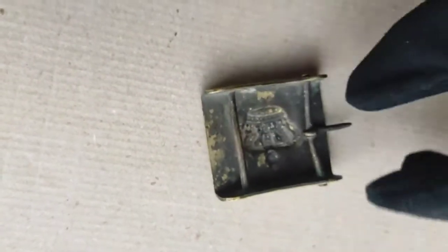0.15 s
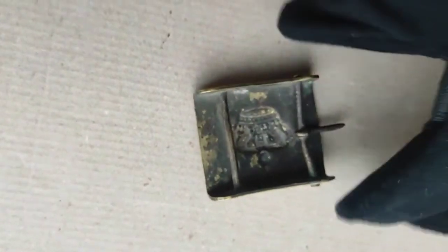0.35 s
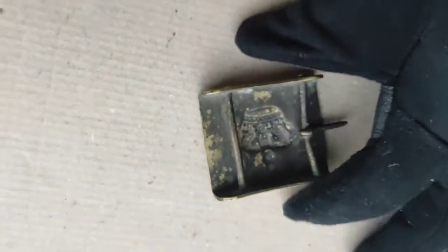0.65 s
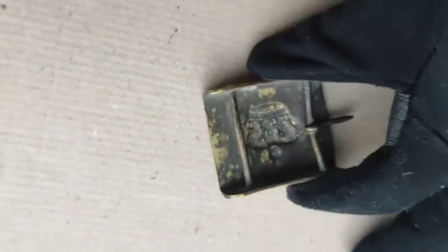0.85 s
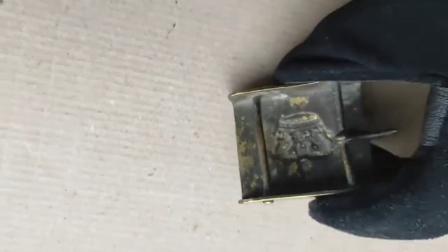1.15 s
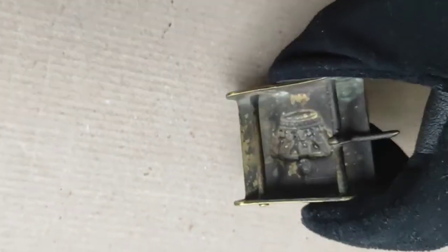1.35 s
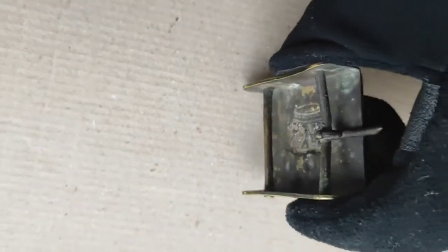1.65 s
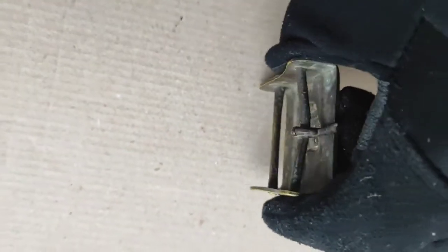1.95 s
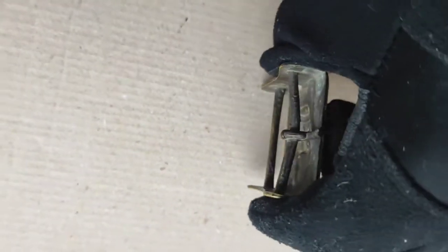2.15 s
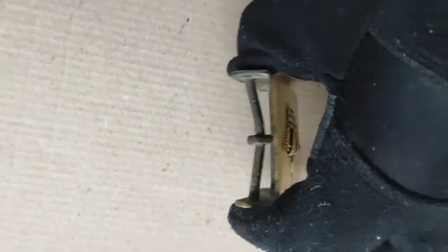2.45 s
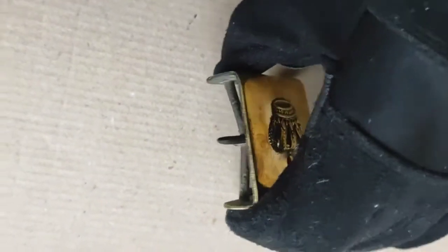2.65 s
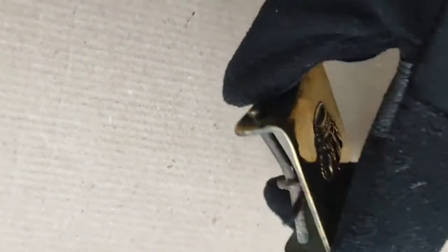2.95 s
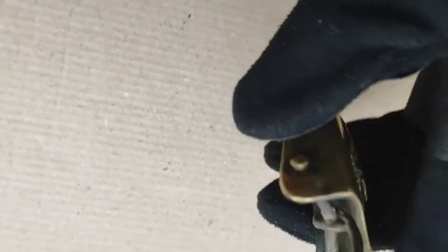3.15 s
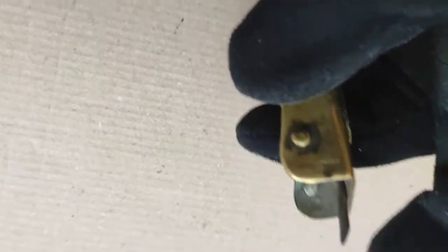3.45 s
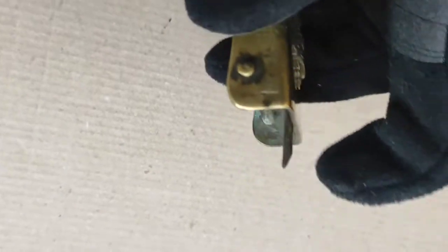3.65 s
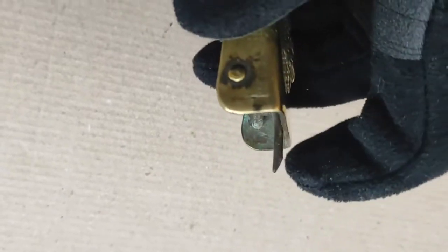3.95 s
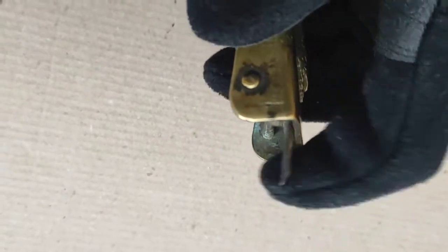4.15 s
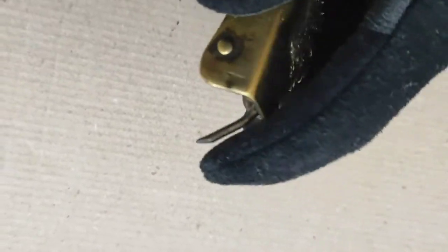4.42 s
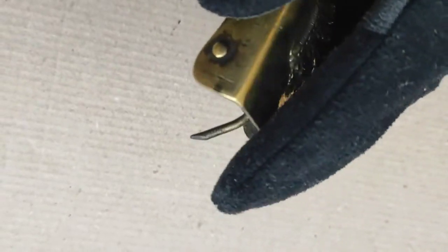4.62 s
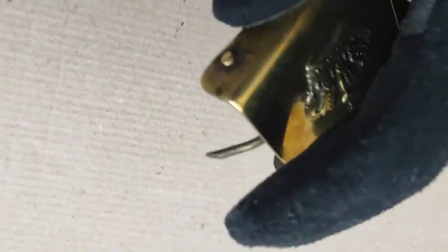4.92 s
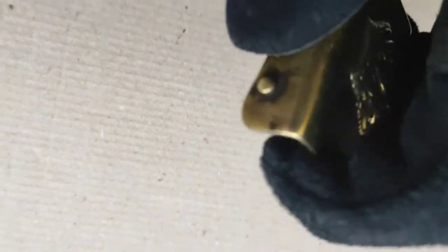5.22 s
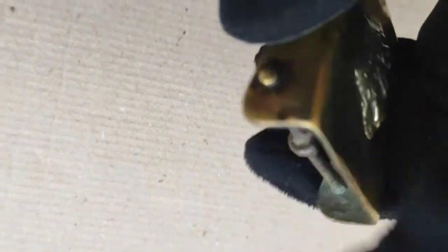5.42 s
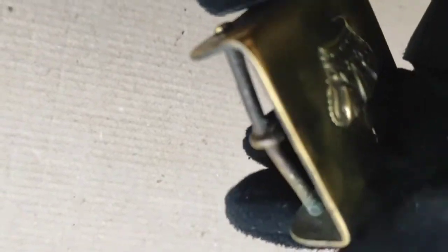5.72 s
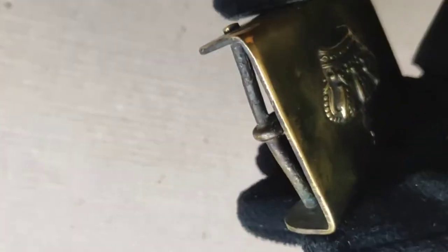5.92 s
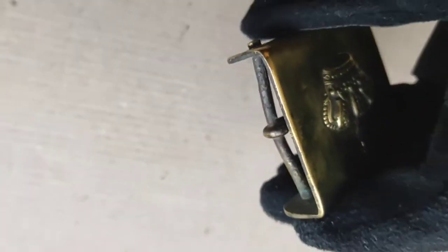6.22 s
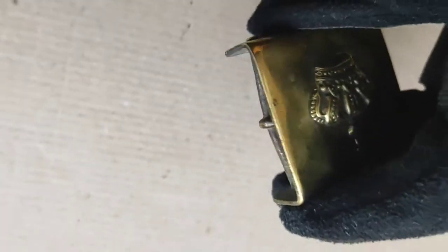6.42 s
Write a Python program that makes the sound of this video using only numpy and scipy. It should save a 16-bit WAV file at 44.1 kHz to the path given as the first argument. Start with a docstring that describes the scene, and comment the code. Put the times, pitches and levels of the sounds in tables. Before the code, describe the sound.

Gloved fingers rub a wooden table in soft strokes, a small brass buckle knocks on wood, then ticks and clinks sharply while turned close by.

```python
"""From the start, gloved fingers stroke a table top over room noise, a fan hum and faint pips: shaped friction noise.
Soft pushes thump, then near one second a small brass buckle knocks on the wood: decaying modes and contact noise.
The fingers lift the buckle and turn it close by; its loose tongue ticks, by scrapes and light ringing of the brass.
Later the tongue squeaks faintly as it swings, a gliding tone, and three times clinks on the frame: struck modes.
The glove strokes go on to the end; a short diffuse room tail follows the metal and table sounds."""
import sys
import numpy as np
from scipy import signal
from scipy.fft import rfft, irfft
from scipy.io import wavfile

SR = 44100
rng = np.random.default_rng(int(sys.argv[2]) if len(sys.argv) > 2 else 0)


def generate_wav(signal):
    """Clip the signal to [-1, 1] and save it as 16-bit WAV at the path in sys.argv[1]."""
    frames = np.transpose(np.atleast_2d(signal))
    scaled = np.clip(frames, -1, 1) * 32767
    pcm = np.round(scaled).astype(np.int16)
    wavfile.write(sys.argv[1], SR, pcm)


N = 290178  # samples
T = np.arange(N) / SR  # s
LEAD_S = 0.002  # silence before each blow
LIFT_S, LIFT_TAKES_S = 1.21, 0.19  # the hand leaves the table with the buckle
EDGE_HZ = 15900  # upper band limit

# In a spectrum or a set of modes the levels are relative: the sound is scaled as a whole afterwards.
# Likeness of the two microphones: pitch_hz, correlation (-1 to 1)
STEREO_LIKENESS = [(30, 0.39), (60, 1), (150, 0.79), (210, 1), (310, -0.94), (640, 0.48), (1400, -0.3),
                   (3000, 0.024)]
# Stereo balance of noise: pitch_hz, left_over_right_db
STEREO_BALANCE = [(60, 6), (200, 2), (380, 10), (700, 4), (1300, 5), (2400, 2), (4400, -2), (9000, 0.5)]
# Low room noise, before a treble cut: pitch_hz, level_db_per_hz
AIR_SPECTRUM = [(12, -28), (29, 6), (39, -8.5), (52, -5), (81, -17), (195, -0.5), (248, -9), (286, -2),
                (320, -6.5), (399, -10), (426, -11), (454, -11.5), (654, -22), (900, -25.5), (1170, -41),
                (1980, -120)]
# Thin background hiss: pitch_hz, level_db_per_hz
FAINT_HISS_SPECTRUM = [(400, -21), (800, 0), (1500, -3.5), (3000, -9), (5000, -12), (7800, -5),
                       (10000, -21.5), (15500, -30)]
# Lines of the fan, before the left-right balance: pitch_hz, level_db
FAN_LINES = [(199.6, -67), (300, -76), (399.5, -71.5), (598, -84.5), (700, -81), (912, -91.5), (1006, -92)]
# A gloved finger slides and comes to rest; rub_db is the reference for cloth, table drone and thread catches:
# start_s, rise_s, hold_s, fade_db_per_s, hiss_db, rub_db
STROKES = [(0.0, 0.0014, 0.054, 75, -53.5, -58.5), (0.172, 0.053, 0.066, 85, -66, -72),
           (0.282, 0.05, 0.0044, 82, -44, -50.5), (0.516, 0.089, 0.032, 87, -45, -53.5),
           (0.597, 0.06, 0.02, 78, -43, -51.5), (0.722, 0.036, 0.024, 99, -44.5, -51),
           (0.869, 0.073, 0.025, 81, -48, -52.5), (0.976, 0.047, 0.12, 166, -46.5, -55),
           (1.232, 0.037, 0.046, 69, -51, -56), (1.385, 0.026, 0.1, 87, -66, -65.5),
           (1.558, 0.032, 0.056, 86, -63.5, -85), (1.691, 0.11, 0.029, 110, -56.5, -57.5),
           (1.878, 0.026, 0.058, 118, -64.5, -62), (1.982, 0.023, 0.16, 85, -66, -81),
           (2.148, 0.093, 0.21, 81, -58.5, -68), (2.515, 0.039, 0.086, 95, -59, -72),
           (2.695, 0.036, 0.012, 124, -59, -60.5), (2.771, 0.032, 0.32, 67, -57, -69.5),
           (3.16, 0.059, 0.18, 118, -60, -70), (3.476, 0.031, 0.41, 83, -70, -71.5),
           (4.11, 0.051, 0.011, 71, -61.5, -87), (4.282, 0.033, .02, 130, -68, -78),
           (4.426, 0.039, .005, 130, -56, -73), (4.552, 0.013, 0.15, 79, -62.5, -77),
           (4.717, 0.034, 0.12, 83, -63, -77.5), (4.886, 0.12, 0.023, 78, -58, -71),
           (5.086, 0.1, 0.22, 81, -57, -68), (5.405, 0.045, 0.24, 77, -56, -70),
           (5.768, 0.026, 0.13, 112, -63.5, -79), (5.976, 0.035, .05, 85, -63.5, -87),
           (6.067, 0.045, 0.09, 85, -59.5, -75), (6.224, 0.034, 0.023, 85, -57.5, -71),
           (6.372, 0.098, 0.067, 85, -60.5, -71)]
# Fibre hiss: pitch_hz, level_db_per_hz
FIBRE_SPECTRUM = [(1500, -23), (3000, -16), (3600, -11), (4300, -11.5), (5100, -11.5), (5600, -6),
                  (6150, -7), (7000, 0.5), (7900, 2), (9200, -5), (10000, -21.5), (11500, -21.5),
                  (14500, -23), (16000, -30)]
# Rub of the cloth: pitch_hz, level_db_per_hz
CLOTH_SPECTRUM = [(250, -33), (600, 3.5), (900, -8), (1300, 1), (1900, 5), (2700, 4), (4000, -13),
                  (7000, -25)]
# Drone of the table, also the colour of a knock's thud: pitch_hz, level_db_per_hz
DRONE_SPECTRUM = [(70, -52), (170, 4.5), (300, -3), (480, -16.5), (700, -2), (1000, -8), (1600, -15),
                  (3000, -34)]
# A thread letting go: pitch_hz, level_db_per_hz
SNAG_SPECTRUM = [(300, 0.5), (900, 1.5), (2300, -6.5), (4000, -8), (7500, 1.5), (10000, -69)]
# A fingertip lands or slips: start_s, level_db, length_s, centre_hz, width_octaves
SCUFFS = [(0.047, -50.5, 0.092, 1870, 0.46), (0.031, -52, 0.15, 185, 0.73),
          (0.2867, -44.5, 0.057, 448, 1.32), (0.298, -47.5, 0.071, 614, 0.24),
          (0.587, -45.5, 0.025, 524, 1.04), (0.613, -43, 0.019, 980, 0.89), (0.757, -47, 0.095, 850, 0.72),
          (1.245, -46, 0.024, 453, 0.37), (1.273, -47, 0.053, 430, 0.39), (1.483, -62.5, 0.07, 1890, 0.26),
          (1.719, -53.5, 0.076, 400, 0.59), (1.793, -51, 0.018, 950, 0.96),
          (1.801, -49.5, 0.037, 825, 0.87), (1.824, -61, 0.0077, 1100, .7), (1.938, -47, 0.0067, 920, 0.75),
          (1.955, -61.5, 0.045, 1194, 0.69), (2.118, -56, 0.01, 940, 0.51),
          (2.222, -49.5, 0.039, 430, 0.31), (2.567, -58.5, 0.055, 890, 0.43),
          (2.578, -57, 0.011, 900, 0.49), (2.688, -60.5, 0.051, 1300, 0.62), (2.727, -53, 0.046, 910, 0.76),
          (2.756, -51, 0.012, 746, 0.35), (3.173, -56, 0.074, 420, 0.38)]
# A fingertip lands and judders on the table: start_s, pitch_hz, level_db, t60_s
THUMPS = [(0.291, 445, -36.5, 0.084), (0.317, 547, -40, 0.058), (0.333, 550, -42, 0.055),
          (0.362, 518, -42.5, .06)]
# The buckle knocks on the table: start_s, level_db, brightness_db
KNOCKS = [(0.9755, -32.5, -3), (.987, -43, -3), (.998, -61, -2), (1.1099, -42.5, -5), (1.1587, -32.5, 7),
          (1.169, -43, -6), (1.179, -44, -12)]
# Modes of the table top: pitch_hz, t60_s, level_db
WOOD_MODES = [(157, 0.1, 3), (217, 0.1, 4.5), (407, 0.079, -1), (589, 0.055, 3), (701, 0.13, -2),
              (813, 0.064, 7), (917, 0.076, 7), (990, 0.028, 11), (1260, 0.033, 3), (1666, 0.092, -5),
              (2250, 0.04, -10)]
# Contact of buckle and table: pitch_hz, level_db_per_hz
TAP_SPECTRUM = [(150, 2), (600, -16), (1000, 16.5), (1600, -10), (2900, -8), (4000, -36), (9000, -48)]
# Top octave of the hiss while the fingers close on the buckle: time_s, level_db
SHEEN = [(.98, -80), (1.03, -58), (1.12, -59), (1.17, -59), (1.22, -73)]
# The tongue shifts on its bar, or bounces on the frame just after a clink: start_s, scrape_db, ring_db,
# scrape_t60_s
TICKS = [(1.629, -59, -58, .05), (2.117, -55, -56, 0.066), (2.565, -50, -60, .11),
         (3.653, -52.5, -66, 0.017), (3.8, -62, -58, .05), (3.807, -49, -56, 0.043),
         (3.8105, -38, -35.5, 0.023), (4.222, -54, -54, 0.12), (4.233, -45.5, -52, 0.098),
         (4.24, -49, -60, 0.25), (5.086, -51, -44.5, 0.04), (5.1015, -50, -44, 0.093),
         (5.191, -52.5, -54, 0.23), (5.287, -50, -53, 0.18), (5.296, -51, -50, .19),
         (5.3231, -27.5, -47, 0.013), (5.326, -39, -41, 0.013)]
# Modes of the buckle, struck at three spots or lightly touched:
# pitch_hz, t60_s, spot_0_db, spot_1_db, spot_2_db, touch_db
BRASS_MODES = [(1711, 0.071, -16, -20, -45, -21), (1779, 0.071, -9, -17, -45, -18),
               (1860, 0.051, -15, -12, -45, -17), (3070, 0.037, -11, -12, -41, -45),
               (3160, 0.09, -23, -25, -15, -12), (3866, 0.043, -23, -33, -23, -24),
               (4350, 0.037, -9, -8, -26, -31), (4498, 0.051, -22, -19, -28, -18),
               (4782, 0.037, -25, -45, -11.5, -23), (4951, 0.051, -13, -13, -7.5, -17),
               (5066, 0.051, -19, -28, -13.5, -20), (5288, 0.051, -45, -25, -18, -45),
               (5630, 0.037, -24, -24, -45, -22), (5710, 0.037, -19, -15, -38, -18),
               (6442, 0.025, -21, -45, -9, -45), (6764, 0.031, -10, -8, 0, -45),
               (6914, 0.037, -25, -14, -2, -41), (7110, 0.051, -15, -45, -10, -13),
               (7225, 0.031, -10, -6, -3, -16), (7444, 0.043, -45, -43, -6, -24),
               (7526, 0.031, -11, -12, -45, -45), (7650, 0.043, -14, -5, -10, -27),
               (7718, 0.043, -5, -2, -9, -16), (7830, 0.06, -4, -13, -11, -16),
               (7926, 0.043, -45, -5, -8, -20), (8050, 0.06, 0, 0, -45, 0),
               (8376, 0.037, -45, -12, -9, -18), (8492, 0.051, -2, -12, -19, -45),
               (8582, 0.031, -9, -15, -3, -9), (9062, 0.025, -45, -45, -10, -45),
               (9562, 0.025, -14, -45, -33, -45), (11742, 0.027, -30, -45, -17, -45),
               (12278, 0.025, -33, -45, -12, -45), (12482, 0.025, -28, -45, -7, -34),
               (13334, 0.043, -27, -28, -26, -45), (13688, 0.042, -28, -21, -2, -45),
               (15576, 0.031, -45, -28, -21, -32)]
# Contact of brass and brass: pitch_hz, level_db_per_hz
CRACK_SPECTRUM = [(500, -45), (900, -17), (1400, -4.5), (1800, -11.5), (2050, -3.5), (2400, -5.5),
                  (2950, -8.5), (3160, 0), (3400, -22), (3650, -12), (4000, -9), (4380, -13), (4650, -12),
                  (4850, 1), (5080, -7), (5400, -6), (5680, -4), (6150, -2.5), (6800, 4), (7800, 12.5),
                  (8250, 10), (8520, 4.5), (8900, -10), (9700, -16.5), (11000, -20), (12350, -8),
                  (12950, -21), (13700, -13), (14350, -24), (16000, -25)]
# Squeak as the tongue swings: time_s, pitch_hz, level_db
SQUEAK = [(3.49, 1270, -74), (3.52, 1335, -75), (3.57, 1385, -76), (3.625, 1364, -82), (3.72, 1320, -86)]
# The tongue falls on the frame, one row a spot; top_db and low_db tilt the crack:
# start_s, ring_db, crack_db, top_db, low_db, rise_s, left_over_right_db
CLINKS = [(3.813, -21, -30.5, -11, 1, 0.0011, 1), (4.341, -23.5, -27.5, -41, -1.5, 0.00048, 0),
          (5.3194, -14.5, -19, 7.5, -16, 0.00025, -0.5)]
# Decay of the room: pitch_hz, t60_s
ROOM_DECAY = [(150, 1), (1000, 0.32), (3200, 0.41), (8000, 0.28), (14000, 0.21)]


def amp(db):
    """Logarithmic level: twenty decibels are a factor of ten in amplitude."""
    return 10 ** (np.asarray(db) / 20)


def unit(x):
    """Power normalisation to an rms of 1."""
    return x / np.sqrt(np.mean(x ** 2) + 1e-20)


def read(points, hz):
    """Linear interpolation on a logarithmic frequency axis."""
    f, value = np.transpose(points)
    return np.interp(np.log(hz + 1), np.log(f + 1), value)


def add(mix, s, sound):
    """Superposition: a stereo sound is summed into the mix from time s."""
    part = mix[:, round(s * SR):][:, :sound.shape[1]]
    part += sound[:, :part.shape[1]]


def wander(rate_hz):
    """Random fluctuation: white noise through a Gaussian low-pass, rms 1."""
    low_pass = np.exp(-(np.fft.rfftfreq(N, 1 / SR) / rate_hz) ** 2)
    return unit(irfft(rfft(rng.standard_normal(N)) * low_pass, N))


def noise(colour_db, size=N, grain=1):
    """Partial coherence: coloured stereo noise whose likeness and balance depend on frequency."""
    hz = np.fft.rfftfreq(size, 1 / SR)
    a, b = rfft(rng.standard_normal((2, size)) * grain)
    same = np.clip(read(STEREO_LIKENESS, hz), -1, 1)
    half_lean = read(STEREO_BALANCE, hz) / 2
    left = a * amp(half_lean)
    right = (same * a + np.sqrt(1 - same ** 2) * b) * amp(-half_lean)
    return unit(irfft(np.array([left, right]) * amp(colour_db(hz)), size))


def uneven(x, depth_db, patch_s, patch_hz):
    """Spectral fluctuation: the colour of a noise drifts in random patches of time and frequency."""
    hz, t, z = signal.stft(x, SR, nperseg=256)
    field = rng.standard_normal(z.shape[1:])
    for axis, width in enumerate([patch_hz / hz[1], patch_s / t[1]]):
        keep = np.exp(-1 / width)
        field = signal.filtfilt([1 - keep], [1, -keep], field, axis=axis, method="gust")
    gain = amp(depth_db * np.clip(unit(field), -2, 2))
    return unit(signal.istft(z * gain, SR, nperseg=256)[1][:, :N])


def dying(t, t60):
    """Exponential decay: the level falls by 60 dB in t60."""
    return np.exp(-np.log(1000) * t / t60)


def arrival(length_s, lag_s):
    """Propagation delay: time since a blow reached each microphone, zero before; the right is nearer."""
    return np.maximum(T[:int(length_s * SR)] - LEAD_S - np.array([[lag_s], [0]]), 0)


def ring(hz, t60, db, t, spread=0.42, blur_hz=14):
    """Modal superposition: one blow starts all modes; loose contact widens each line by phase diffusion."""
    gain = amp(db) / np.linalg.norm(amp(db)) * np.sqrt(2)
    steps = rng.standard_normal((len(hz), 1, t.shape[1]))
    drift = np.cumsum(steps, axis=2) * np.sqrt(blur_hz / (2 * np.pi * SR))
    # phases in cycles; spread sets the microphones apart
    phases = rng.random((len(hz), 1, 1)) + spread * rng.random((len(hz), 2, 1)) + drift
    return sum(g * dying(t, decay) * np.sin(2 * np.pi * (f * t + p))
               for f, decay, g, p in zip(hz, t60, gain, phases))


def burst(colour_db, envelope):
    """Minimum-phase filtering: resonances ring on after a burst of contact noise, not before it."""
    size = envelope.shape[-1]
    log_gain = np.log(amp(colour_db(abs(np.fft.fftfreq(size, 1 / SR)))))
    # the Hilbert transform of the log gain gives the minimum phase
    delay = np.exp(-1j * signal.hilbert(log_gain).imag[:size // 2 + 1])
    filtered = irfft(rfft(noise(colour_db, size, envelope)) * delay, size)
    return filtered * np.sqrt(np.mean(envelope ** 2))


def background(air_db=-55.5, hiss_db=-72, waver_hz=1.843, waver_db=2.0, lean_db=2):
    """Stationary noise and frequency modulation: room noise, thin hiss and wavering lines of a fan."""
    air = noise(lambda hz: read(AIR_SPECTRUM, hz) + read([(900, -7), (2000, -39)], hz))
    hiss = noise(lambda hz: read(FAINT_HISS_SPECTRUM, hz))
    hum = np.zeros(N)
    for hz, db in FAN_LINES:
        cycles = np.cumsum(hz + waver_hz * wander(5.66)) / SR
        hum += amp(db + waver_db * wander(1.3)) * np.sqrt(2) * np.sin(2 * np.pi * cycles)
    return amp(air_db) * air + amp(hiss_db) * hiss + hum * amp([[lean_db], [-lean_db]])


def strokes():
    """Sliding speed sets friction level: strokes rise, hold and decay, and overlaps add in power."""
    clock = T[::64]
    start, rise, hold, fade, *levels = np.transpose(STROKES)[:, :, None]
    t = clock - start
    speed = np.clip(t / rise, 0, 1) * amp(-fade * np.maximum(t - rise - hold, 0))
    return [np.interp(T, clock, np.linalg.norm(speed * amp(db), axis=0)) for db in levels]


def gloves(hiss, rub, rub_db=-3, drone_db=-1, flutter_db=0.5, grain_db=0.5):
    """Stick-slip friction: grainy fibres, cloth and table share one pressure; the table fades at the lift."""
    pressure = amp(flutter_db * wander(47.7))
    fibres = noise(lambda hz: read(FIBRE_SPECTRUM, hz), grain=amp(grain_db * wander(1500)))
    fibres = uneven(fibres, depth_db=2.5, patch_s=0.0086, patch_hz=130) * hiss
    cloth = noise(lambda hz: read(CLOTH_SPECTRUM, hz), grain=amp(grain_db * wander(400)))
    cloth = uneven(cloth, depth_db=2.5, patch_s=0.01, patch_hz=200) * amp(rub_db) * rub
    on_table = np.clip(1 - (T - LIFT_S) / LIFT_TAKES_S, 0, 1)
    table = noise(lambda hz: read(DRONE_SPECTRUM, hz)) * amp(drone_db) * rub * on_table
    return pressure * (fibres + cloth + table)


def catches(rub, per_s=130, db=-2.0, t60=0.079):
    """Random (Poisson-like) impulses: threads snag and let go, louder the harder the cloth rubs."""
    snags = (rng.random(N) < per_s / SR) * rng.uniform(0.15, 1, N)
    envelope = signal.oaconvolve(snags, dying(T[:SR // 20], t60))[:N]
    return noise(lambda hz: read(SNAG_SPECTRUM, hz), grain=envelope) * amp(db) * rub


def pips(db=-69, length_s=0.019, every_s=0.2):
    """Periodic repetition: a very faint high noise pip sounds five times a second."""
    out, size = np.zeros((2, N)), int(length_s * SR)
    colour = [(8100, -20), (9200, 6), (10300, 23), (11300, 7.0), (15000, 0.0)]
    for s in np.arange(0.025, 6.5, every_s):
        pip = noise(lambda hz: read(colour, hz), size=size)
        add(out, s, amp(db + rng.uniform(-4, 3)) * pip * np.hanning(size))
    return out


def scuffs(skirt_db=32, grit_db=3):
    """Band-limited friction noise: gritty puffs swell quickly and fade."""
    out, t = np.zeros((2, N)), T[:SR // 3]
    grit = amp(grit_db * wander(370))
    for s, db, length, centre_hz, octaves in SCUFFS:
        def colour(hz):
            """Band-pass law: a rounded peak with level skirts, and a treble cut."""
            offset = np.log2((hz + 1) / centre_hz) / octaves
            return -skirt_db * np.tanh(offset ** 2 / 7) + read([(5000, 0), (10000, -20)], hz)
        puff = noise(colour, size=len(t), grain=grit[round(s * SR):][:len(t)])
        u = 4 * t / length  # the swell peaks at u = 1
        add(out, s, amp(db) * puff * u * np.exp(1 - u))
    return out


def thumps(rise_s=0.0054, lean_db=3.5):
    """Damped oscillation: each soft push sets the table top swinging briefly."""
    out, t = np.zeros((2, N)), T[:SR // 6]
    for s, hz, db, t60 in THUMPS:
        envelope = (1 - np.exp(-t / rise_s)) * dying(t, t60)
        swing = envelope * np.sqrt(2) * np.sin(2 * np.pi * hz * t)
        add(out, s, amp(db) * swing * amp([[lean_db], [-lean_db]]))
    return out


def knocks(rise_s=0.00055, lean_db=1, lag_s=0.00045, tap_db=2, tap_t60=0.012, thud_db=-8, thud_t60=0.12):
    """Impact excitation: the rocking buckle taps, rings the wood and thuds; a harder edge is brighter."""
    out, t = np.zeros((2, N)), arrival(0.37, lag_s)
    onset = 1 - np.exp(-t / rise_s)
    for s, db, bright_db in KNOCKS:
        tap = burst(lambda hz: read(TAP_SPECTRUM, hz) + read([(1000, 0), (2800, bright_db)], hz),
                    onset * dying(t, tap_t60))
        thud = burst(lambda hz: read(DRONE_SPECTRUM, hz), onset * dying(t, thud_t60))
        wood = onset * ring(*np.transpose(WOOD_MODES), t)
        add(out, s - LEAD_S, amp(db) * (wood + amp(tap_db) * tap + amp(thud_db) * thud))
    return out * amp([[lean_db], [-lean_db]])


def sheen():
    """Amplitude modulation of high-band noise: a thin hiss on top of the rustle."""
    s, db = np.transpose(SHEEN)
    level = amp(np.interp(T, s, db, left=-np.inf, right=-np.inf))
    return level * noise(lambda hz: read([(7000, -30), (9500, 1), (14000, -7), (16000, -8)], hz))


def ticks(rise_share=0.01, body_db=4, lag_s=0.0002):
    """Light contact: a scrape with a little brass ring; the longer the scrape, the softer its start."""
    out, t = np.zeros((2, N)), arrival(0.19, lag_s)
    mode_hz, t60, *_, touch = np.transpose(BRASS_MODES)
    brass = ring(mode_hz, t60, touch, t)
    for s, scrape_db, ring_db, scrape_t60 in TICKS:
        onset = 1 - np.exp(-(t / (rise_share * scrape_t60)) ** 2)
        scrape = burst(lambda hz: read(CRACK_SPECTRUM, hz) + read([(3000, body_db), (7000, 0.0045)], hz),
                       onset * dying(t, scrape_t60))
        add(out, s - LEAD_S, amp(scrape_db) * scrape + amp(ring_db) * onset * brass)
    return out


def squeak(whistle_db=-8, whistle_hz=5520):
    """Frequency modulation: a thin unsteady tone arches in pitch under a fuzzy whistle of fixed centre."""
    s, hz, db = np.transpose(SQUEAK)
    turn = 2 * np.pi * np.cumsum(np.interp(T, s, hz) * (1 + 0.0073 * wander(115))) / SR
    whistle = np.sin(2 * np.pi * np.cumsum(whistle_hz * (1 + 0.015 * wander(300))) / SR)
    level = amp(np.interp(T, s, db, left=-np.inf, right=-np.inf) + 3.5 * wander(60))
    return level * np.sqrt(2) * (np.sin(turn) + amp(whistle_db) * whistle)


def clinks(crack_t60=0.055, snap_db=6, snap_t60=0.0072, lag_s=0.0002033):
    """Impact and damping: a hard blow rings the brass, noise gives the chatter, and gloves damp the ring."""
    out, t = np.zeros((2, N)), arrival(0.2, lag_s)
    mode_hz, t60, *spots = np.transpose(BRASS_MODES)  # zip below leaves the touch column unused
    for (s, ring_db, crack_db, top_db, low_db, rise, lean), spot in zip(CLINKS, spots):
        onset = 1 - np.exp(-(t / rise) ** 2)
        tilt = [(1200, low_db), (4000, 0), (8300, 0), (10500, top_db)]
        decay = dying(t, crack_t60) + amp(snap_db) * dying(t, snap_t60)
        crack = burst(lambda hz: read(CRACK_SPECTRUM, hz) + read(tilt, hz), onset * decay)
        brass = onset * ring(mode_hz, t60, spot, t, blur_hz=30)
        sound = amp(ring_db) * brass + amp(crack_db) * crack
        add(out, s - LEAD_S, sound * amp([[lean / 2], [-lean / 2]]))
    return out


def room(x, build_s=0.0049):
    """Diffuse reverberation: a tail builds up as the walls answer; each band has its own decay time."""
    hz, t, z = signal.stft(rng.standard_normal((2, SR // 2)), SR, nperseg=256)
    envelope = dying(t, read(ROOM_DECAY, hz)[:, None]) * (1 - np.exp(-(t / build_s) ** 2))
    tail = signal.istft(z * envelope, SR, nperseg=256)[1]
    return signal.fftconvolve(x, tail / np.linalg.norm(tail[0]), axes=1)[:, :N]


def scene(metal_room_db=-16, table_room_db=-10):
    """Direct and reverberant sound: metal, table and cloth close by, the room behind."""
    hiss, rub = strokes()
    table = catches(rub) + scuffs() + thumps() + knocks()
    metal = ticks() + squeak() + clinks()
    close = gloves(hiss, rub) + sheen() + table + metal
    behind = amp(metal_room_db) * room(metal) + amp(table_room_db) * room(table)
    return background() + pips() + close + behind


def record(dry):
    """Band limitation: a linear-phase low-pass at EDGE_HZ."""
    low_pass = signal.firwin(511, EDGE_HZ, window=("kaiser", 9), fs=SR)
    return signal.oaconvolve(dry, low_pass[None], "same", axes=1)


dry = scene()
out = record(dry)
generate_wav(out)
```